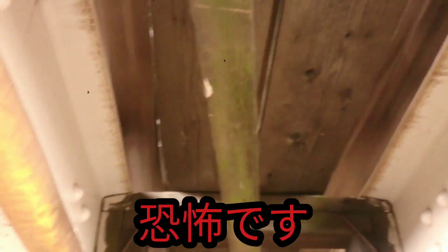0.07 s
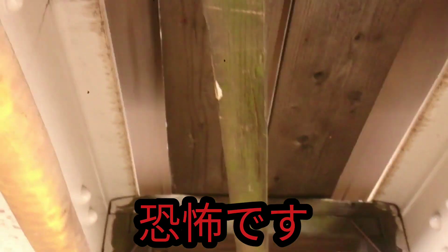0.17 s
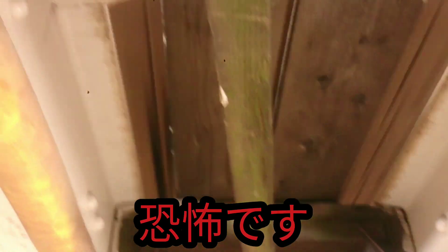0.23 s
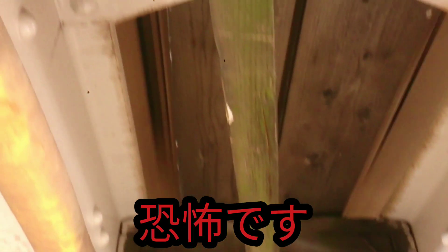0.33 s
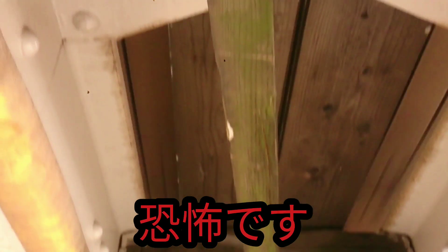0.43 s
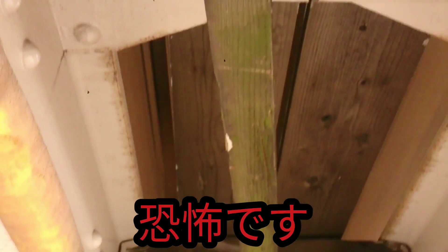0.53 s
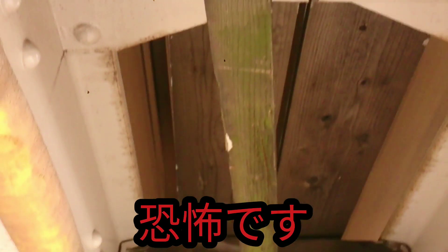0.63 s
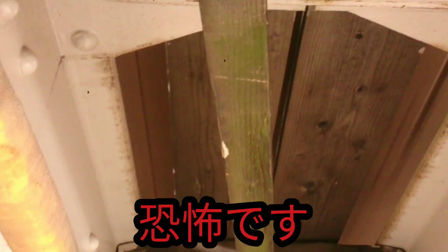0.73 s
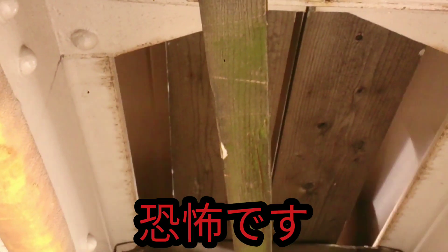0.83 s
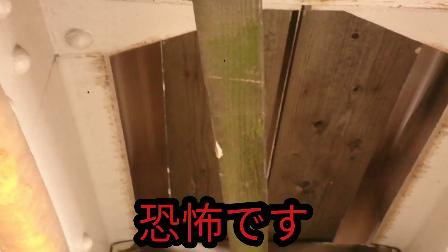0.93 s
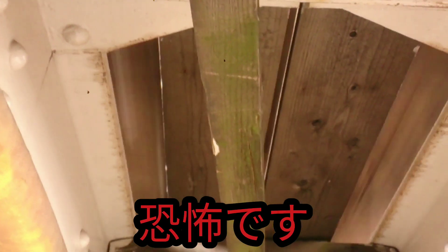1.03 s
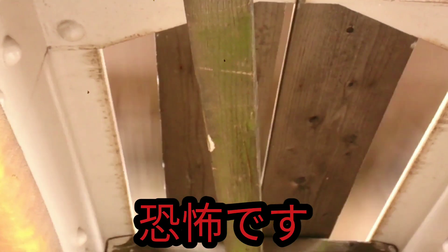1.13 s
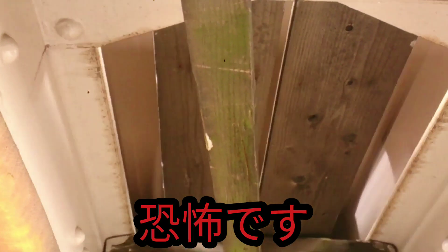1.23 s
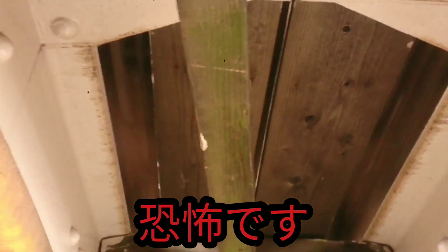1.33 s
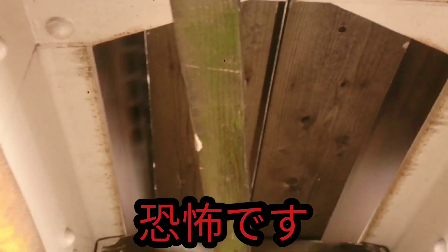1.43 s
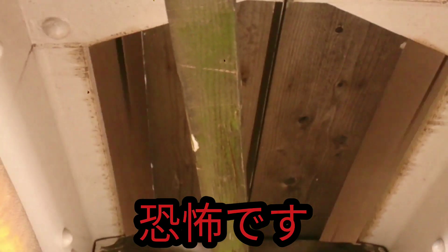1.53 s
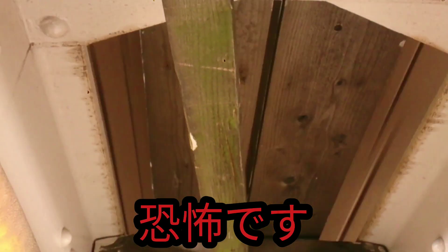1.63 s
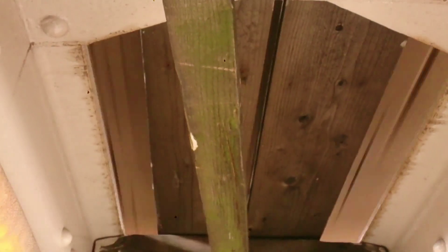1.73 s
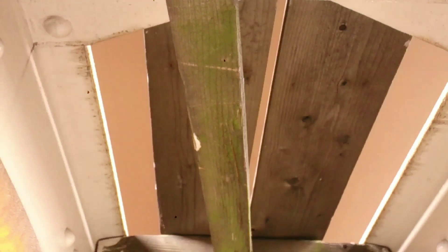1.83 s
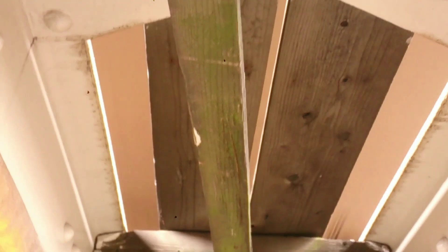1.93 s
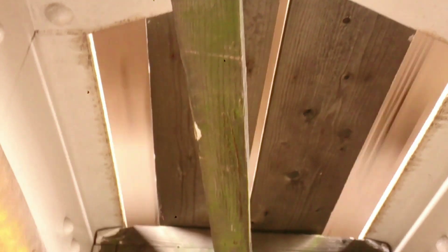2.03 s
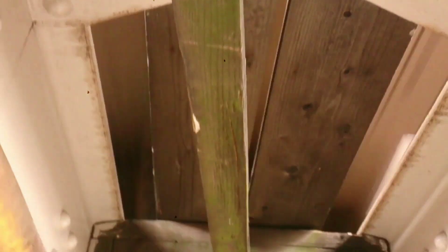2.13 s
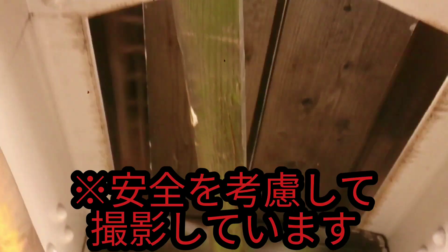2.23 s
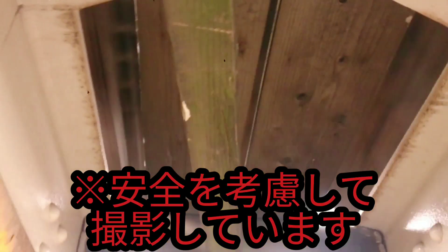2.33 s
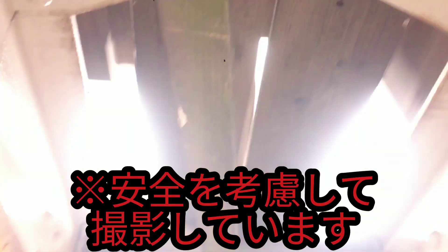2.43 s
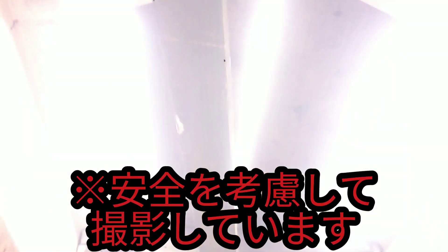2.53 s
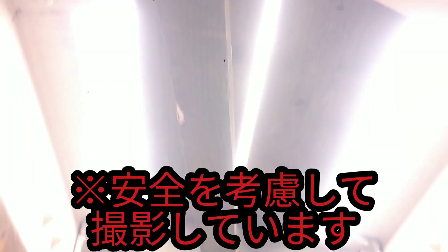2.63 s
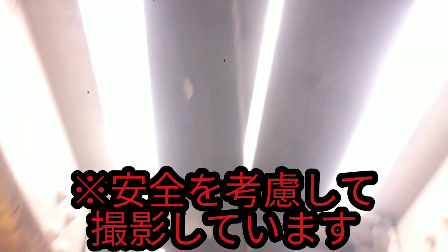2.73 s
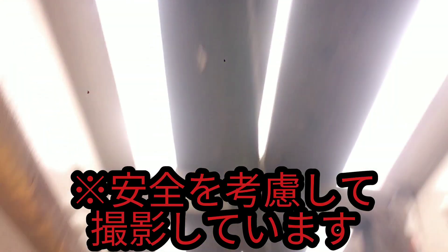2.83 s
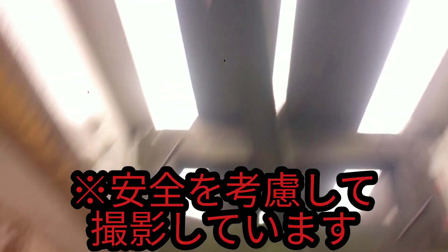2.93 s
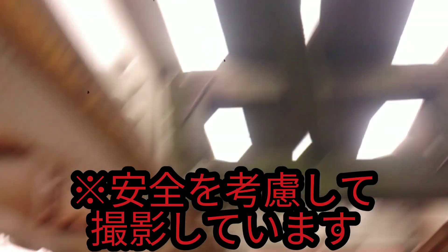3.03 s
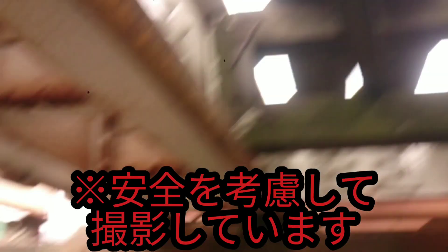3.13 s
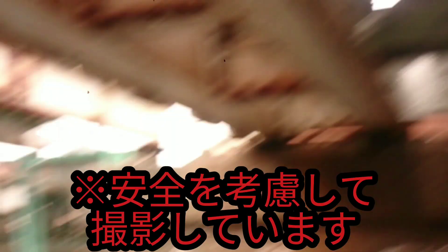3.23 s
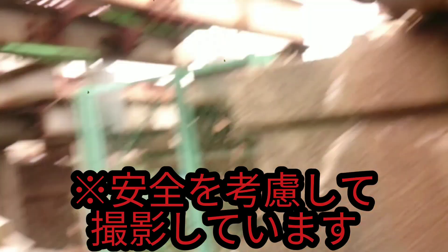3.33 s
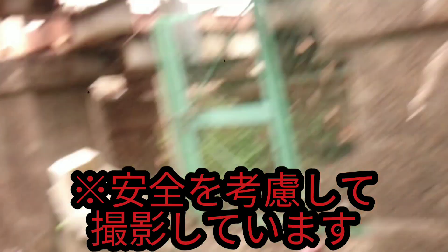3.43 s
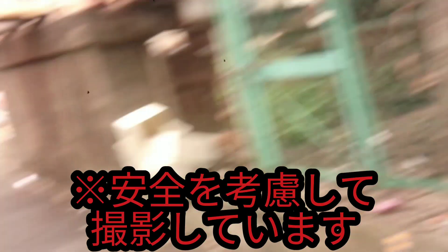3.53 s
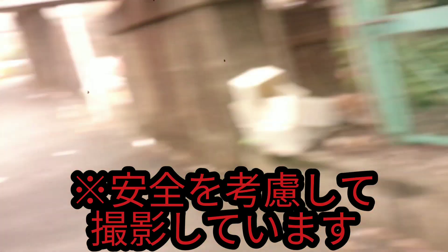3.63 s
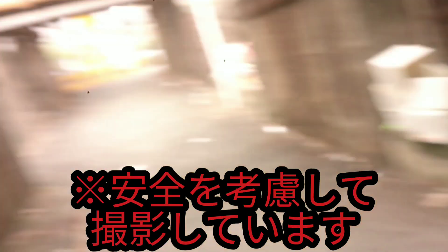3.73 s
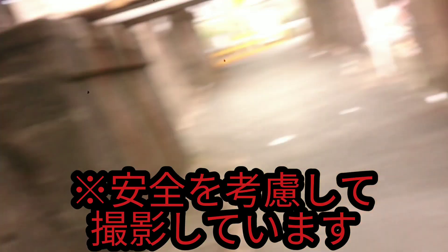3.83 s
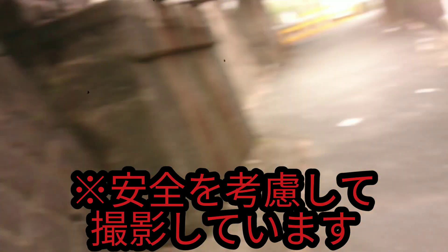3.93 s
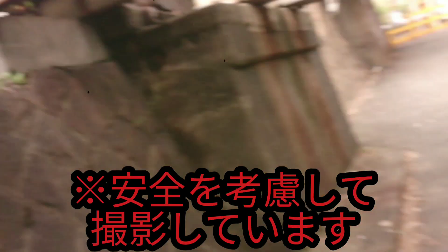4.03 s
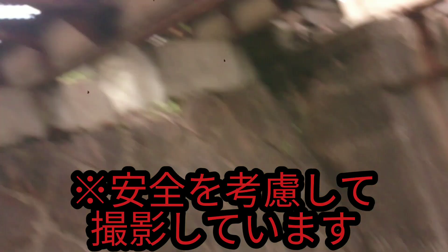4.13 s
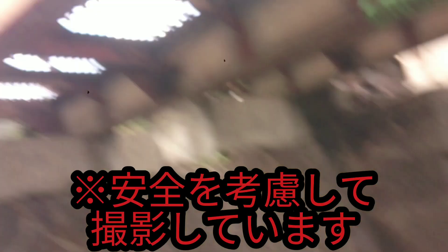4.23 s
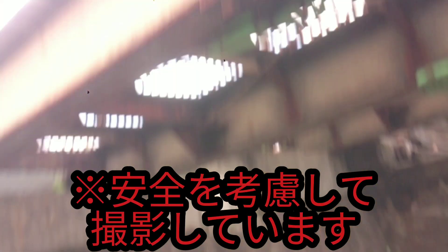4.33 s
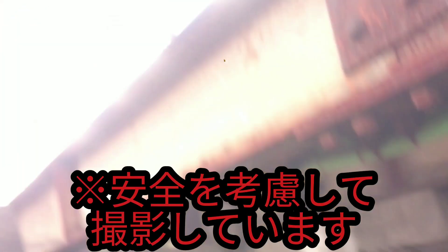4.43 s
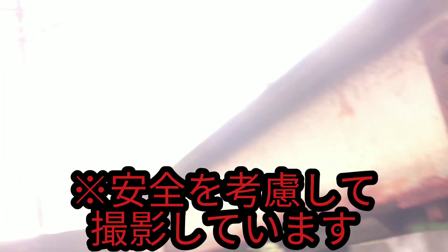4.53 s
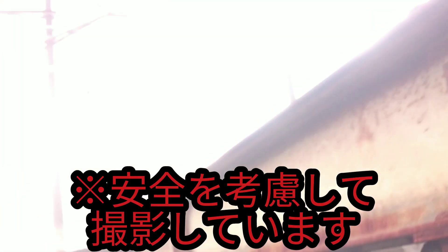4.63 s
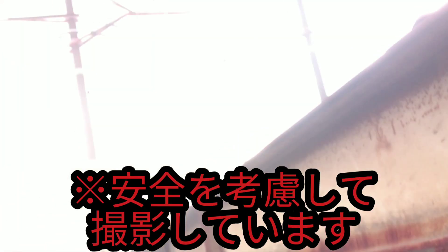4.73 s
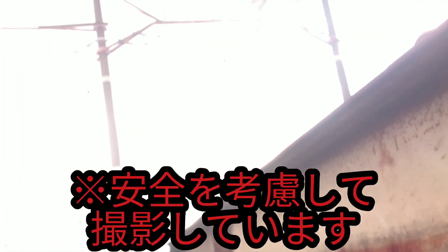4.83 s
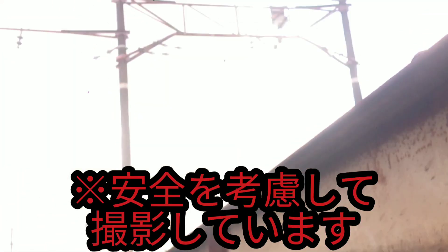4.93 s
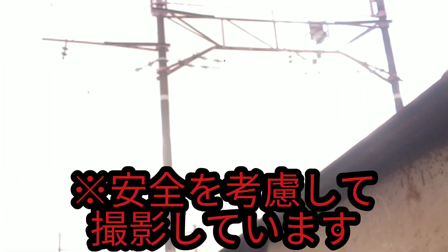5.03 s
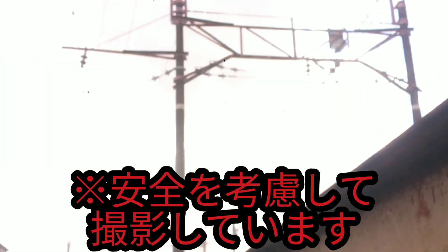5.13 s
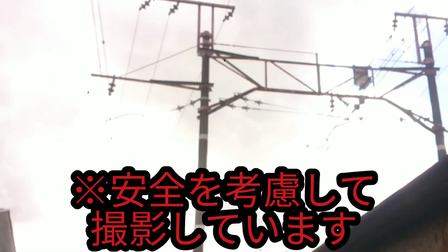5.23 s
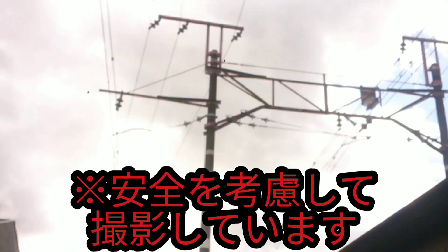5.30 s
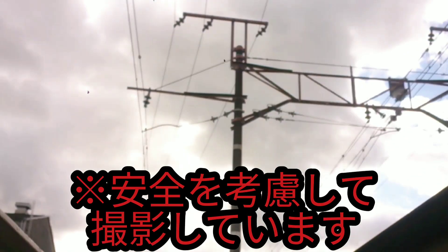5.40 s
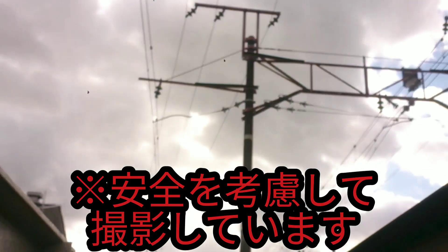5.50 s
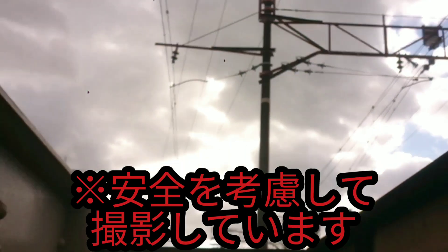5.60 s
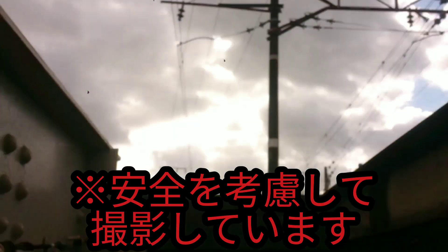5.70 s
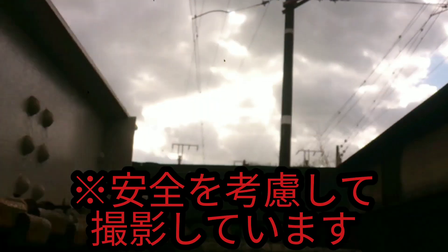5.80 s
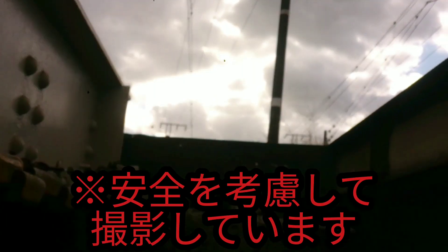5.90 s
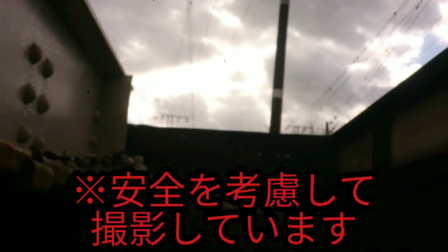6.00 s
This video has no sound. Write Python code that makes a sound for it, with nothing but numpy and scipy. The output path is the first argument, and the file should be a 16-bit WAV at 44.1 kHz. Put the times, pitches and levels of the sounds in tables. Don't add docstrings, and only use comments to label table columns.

```python
import sys
import numpy as np
from scipy import signal
from scipy.fft import rfft, irfft, next_fast_len
from scipy.io import wavfile
from scipy.ndimage import uniform_filter1d

SR = 44100
rng = np.random.default_rng(int(sys.argv[2]) if len(sys.argv) > 2 else 0)


def how_loud(loudness_db):
    steps = np.asarray(loudness_db, float) / 20
    return 10 ** steps


def store_wav(level_fs):
    pcm = np.round(np.clip(np.atleast_2d(level_fs), -1, 1) * 32767)
    wavfile.write(sys.argv[1], SR, pcm.T.astype(np.int16))


N = 267246

# (frequency [Hz], level [dB per Hz])
SHAKE = [
    [(4, -35), (10, 3.5), (25, -18.5), (33, -7), (45, 1), (58, -13), (75, -4.5), (90, -16.5), (120, -13), (200, -120)],
    [(3.5, -30), (6.0, 5.5), (19, 3), (38, -21.5), (58, -9), (70, -26), (90, -34), (120, -56), (200, -120)],
]
DECK = [
    [(47, -40), (80, -16.5), (162, -4.5), (259, -16), (303, -11.5), (407, -11.5), (453, -10), (1000, -18.5), (1300, -22), (2200, -120)],
    [(47, -40), (80, -0.5), (151, 2.5), (243, -8.5), (306, -3), (399, -9.5), (448, -0.5), (676, -15.5), (1000, -20), (1300, -41), (2200, -120)],
]
ROAR = [
    [(350, -61), (600, -4), (1230, -0.5), (1430, -2.5), (1820, -2), (1990, 1), (3240, -7.5), (3700, -10.5), (5000, -36), (6500, -50), (11000, -120)],
    [(350, -40), (600, -17), (667, -13), (1330, -2), (1540, -19), (1940, 0), (2130, -11), (2390, -3.5), (3410, -2), (5000, -10), (6500, -46), (11000, -120)],
]
HISS = [
    [(2350, -9), (4000, -2.5), (5070, -4.5), (5870, 0), (6810, 0), (8400, -9.5), (11300, -15), (13600, -29), (14100, -39)],
    [(2350, -40), (4000, -6.5), (4400, -18), (4680, -9.5), (6320, 2.5), (7850, -3.5), (8720, -5.5), (9790, -6.5), (12500, -8.5), (14100, -18)],
]
CLANK = [
    [(470, -2), (800, -23), (1220, -4), (1380, -10), (1640, -7), (1840, -9), (2630, -7.5), (3000, -14), (3900, -39), (6600, -120)],
    [(470, -52), (800, -31), (1470, -4.5), (1840, -14), (2110, 1), (2280, -10.5), (3000, -28), (3900, -45), (6600, -120)],
]
RATTLE = [
    [(1650, -41), (2800, -7.5), (3680, 2.5), (3990, -2.5), (5100, 0), (6630, 1), (11200, -120)],
    [(1650, -33), (2800, -3), (3250, 0), (3490, -4), (4480, -2), (5100, -21), (6630, -47), (11200, -120)],
]
SIZZLE = [
    [(2940, -46), (5000, -12), (5890, 0.5), (6540, 6.5), (8190, 0.5), (9050, 1.5), (10700, -3.5), (13200, -22.5), (14100, -19)],
    [(2940, -35), (5000, -22), (5310, 6), (6350, 2), (8300, -5), (10800, -27), (11800, -41), (14100, -34)],
]

# (frequency [Hz], width [Hz], level [dB])
GIRDER = [(114, 4.4, -5), (163, 25, -4), (228.8, 2.4, -7), (303, 47, -4), (332.5, 4.9, -18), (434, 38, -10),
          (577, 11, -54)]
# (frequency [Hz], width [Hz], level [dB])
RAIL = [(1360, 69, -35), (1477, 77, -1), (2120, 7.9, 3.5), (2372, 25, -0.5), (3700, 43, -29)]
# (frequency [Hz], level [dB], t60 [s])
WHEEL = [(458, -22, 0.17), (1260, 0, 0.068), (1490, -26, .1), (2120, -13, 0.13), (2494, -6, 0.08),
         (3260, -13, 0.16), (4600, -3, 0.091), (5200, -16, 0.075), (6230, -23, .1), (6100, 5, 0.08),
         (6720, 7, 0.042), (6900, -7, .1)]
# (time [s], share arriving along the rails [0-1])
DEPARTURE = [(2.9, 0.019), (3.7, 0.4), (4.6, 0.74)]
# (time [s], level [dB])
LOAD = [(0, -19), (.3, -21.5), (.6, -21), (.84, -29), (1.02, -29.5), (1.11, -24), (1.44, -19.5),
        (1.54, -23), (1.68, -21.5), (1.9, -21), (2.27, -37), (2.46, -22.5), (2.82, -23), (3.17, -41),
        (3.8, -45), (4.66, -52.5), (5.1, -50.5), (6.06, -52.5)]
# (time [s], level [dB])
NEARNESS = [(0, -30), (.25, -30.5), (.57, -28), (.72, -25.5), (.84, -36), (1.01, -37.5), (1.3, -30.5),
            (1.7, -29), (2.03, -27), (2.15, -37), (2.35, -36.5), (2.79, -30), (2.99, -36), (3.14, -43),
            (3.37, -45.5), (4.46, -52.5), (5.3, -54.5), (6.06, -54)]
# (time [s], level [dB], length [s])
LURCHES = [(.1, -26, 0.21), (.37, -28, 0.1), (0.693, -25, 0.079), (0.97, -28, 0.044), (1.45, -31, 0.13),
           (1.75, -28, 0.2), (2.014, -24, 0.13), (2.24, -32, .15), (2.868, -27.5, 0.11), (3.16, -33, 0.17),
           (3.44, -35, .08), (3.876, -38, 0.11), (4.196, -36, 0.067), (4.283, -31, 0.058),
           (4.488, -33.5, 0.24), (4.62, -37, .08), (4.91, -36, 0.24), (5.332, -36, 0.22),
           (5.808, -44, 0.15)]

# (time [s], clank [dB], brighter by [dB], heavier by [dB])
OVERHEAD = [
    (.4959, -9, -2.5, -9),
    (.6266, -10.5, -4, 5),
    (1.8052, -9.5, -5, 5),
    (1.9353, -9.5, -6, 5),
]
SPAN_END = [
    (.7194, -28, 1, 11),
    (.8700, -20, 3.5, 4.5),
    (1.156, -14.5, -4.5, 1),
    (1.2845, -12.5, -0.5, 9),
    (2.048, -22, 3, 2),
    (2.1775, -17, 2, 2),
    (2.4655, -13.5, -3, -7),
    (2.5955, -11.5, -6, 4),
]
LOOSE_CLIPS = [
    (.002, -16, -14, -3),
    (.1424, -24, 2, -5),
    (1.4494, -27, 2, 4),
    (1.5994, -24, 2.5, 4),
    (1.655, -24, -4, 0),
    (2.755, -22, 0, 4),
    (2.9134, -20, -4, -4),
]
OVERHEAD_MORE = [
    (.912, -13, 2.5, -5),
    (1.0428, -13.5, 4, -3),
]
LAST_BOGIE = [
    (3.358, -15, 0, 0),
    (3.492, -13.5, -1, 0),
]
EMBANKMENT = [
    (4.2065, -31, -1.9, 1),
    (4.339, -31.5, -0.84, -2.5),
]
FAR = [
    (3.6094, -43, 2, -13),
    (3.7499, -34, 4, 0),
    (3.918, -36.5, -6, 8.5),
    (4.034, -36, -2, -13),
    (4.1634, -31, 3, -9),
    (4.4164, -43.5, 3, 9.5),
    (4.5474, -45.5, 11, 5),
]
FARTHEST = [
    (4.931, -31, -7, 3.5),
    (5.064, -32, 2.5, 1.5),
    (5.177, -37.5, 3, 0),
    (5.312, -40, 8.5, -2),
    (5.607, -40.5, 7, -2),
    (5.735, -35.5, 0, -1.5),
]
# (frequency [Hz], level [dB over clank, under 1 kHz over thud], t60 [s])
PLACES = [
    (OVERHEAD, (-27.5, -13, -4.5, 0.5, 0), [(2180, -13, .08), (2580, -12, 0.12), (1650, -16, .08), (5860, -15, 0.1), (1230, -11, 0.12), (7200, -16, .04)]),
    (OVERHEAD_MORE, (-27.5, -13, -5.5, 0.5, 0), [(2100, -11, .05), (2440, -12, 0.06), (1230, -14, .1), (6570, -4, 0.07), (7000, -7, 0.08)]),
    (SPAN_END, (-8.5, -8, -13.5, 0.4, .001), [(1274, -13, 0.04), (889, -5, 0.047), (4080, -14, .04)]),
    (LAST_BOGIE, (-6.5, -7, -15, 0.36, .003), [(1280, -4, 0.035), (1490, -10, 0.04), (930, -4, .04), (4040, -12, .05), (6200, -15, .05)]),
    (LOOSE_CLIPS, (-9, 1, -2, 0.25, .001), [(5900, -12, .1)]),
    (EMBANKMENT, (-4.5, -6, -7, 0.3, .001), [(470, 1, 0.11)]),
    (FAR, (-10, -16, -20, 0.45, .001), [(2080, -11, 0.07), (3230, -16, .04)]),
    (FARTHEST, (-9, -13, -24.5, 0.24, 0), [(2140, -10, 0.1), (3200, -11, 0.05)]),
]
# (time [s], frequency [Hz], peak [dB], t60 [s])
OWN_RINGS = [(.515, 2400, -20, .05), (1.806, 6500, -17, .03), (1.937, 7600, -19, .03),
             (4.548, 6300, -48, .03), (4.55, 7300, -48, .04), (2.02, 5900, -26, .05),
             (2.052, 3900, -30, .08), (2.05, 1550, -28, .04), (2.915, 6000, -28, .12),
             (1.6, 6700, -26, .08), (3.918, 1400, -44, .05), (4.208, 1440, -36, .06),
             (4.208, 2300, -38, .03), (4.21, 6410, -39, .17), (4.22, 3290, -42, .08),
             (4.345, 6800, -40, .12), (4.34, 5440, -40, .08), (4.343, 4350, -42, .08),
             (4.338, 3130, -44, .05), (4.415, 2000, -44, .05), (4.932, 2150, -38, .15),
             (4.94, 1445, -46, .1), (4.95, 320, -42, .15), (4.95, 490, -44, .12), (5.07, 2390, -44, .1),
             (5.08, 1250, -46, .1), (5.068, 4340, -50, .05), (5.1, 318, -42, .1), (5.18, 3450, -48, .06),
             (5.19, 2450, -45, .1), (5.312, 2860, -42, .04), (5.312, 3500, -44, .04),
             (5.607, 3300, -46, .05), (5.607, 2120, -43, .06), (5.737, 2300, -43, .05),
             (5.74, 1400, -51, .05), (5.745, 470, -47, .12)]
# (time [s], frequency [Hz], peak [dB], length [s])
BOOMS = [(.15, 165, -20, .15), (.44, 150, -22.5, .07), (.57, 166, -19, .09), (.73, 160, -23.5, .09),
         (1.15, 172, -22, .12), (1.45, 155, -20.5, .08), (1.73, 150, -23.5, .06), (1.88, 166, -19, .09),
         (2.1, 185, -29, .12), (2.55, 170, -24, .14), (2.78, 162, -19.5, .09), (3.02, 155, -30, .07),
         (4.3, 170, -44, .15), (5.02, 150, -45, .15)]
# (start [s], stop [s], frequency [Hz], width [Hz], level [dB])
SINGING = [(2.449, 3.684, 2070, 120, -51.5), (3.0, 3.3, 1310, 460, -49), (3.716, 4.023, 1220, 170, -50.5),
           (3.748, 4.3, 2080, 260, -56), (4.402, 4.72, 2190, 54, -59), (4.52, 4.72, 6340, 700, -57),
           (4.7, 5.91, 8830, 70, -72), (5.25, 6.065, 450, 38, -64.5), (4.93, 5.215, 318, 90, -51),
           (5.16, 5.27, 217, 12, -55.5), (3.79, 3.93, 3430, 40, -55)]
# (frequency [Hz], level [dB against neighbours])
HOLES = [(7000, -7), (9000, -4.6), (10500, -3.2), (12000, -1.8), (13500, -.5)]


def rms_one(x):
    return x / np.sqrt(np.mean(x ** 2) + 1e-20)


def drift(rate):
    r = np.exp(-80 * np.pi * rate / SR)
    slow = signal.lfilter([1], [1, -2 * r, r * r], rng.standard_normal(N // 40 + 2002))[2000:]
    return np.interp(np.arange(N) / 40, np.arange(len(slow)), rms_one(slow))


def resonate(x, hz, width_hz):
    r = np.exp(-np.pi * width_hz / SR)
    poles = [1, -2 * r * np.cos(2 * np.pi * hz / SR), r * r]
    return signal.lfilter(np.array([1, 0, -1]) * (1 - r * r) / 2, poles, x)


def ring_width(t60):
    return np.log(1000) / np.pi / t60


def gone(s):
    return np.clip(np.interp(s, *np.transpose(DEPARTURE)), 0, 1)


def banded_noise(spectra, patchy_db, flicker):
    overhead = spectra[0]
    low_hz, high_hz = overhead[1][0] * .7, min(overhead[-2][0] * 1.4, 16000)
    edges = low_hz * 2 ** np.arange(0, np.log2(high_hz / low_hz) + .4, .5)
    white = rng.standard_normal((2, N))
    flat = np.zeros(N)
    for k, (low, high) in enumerate(zip(edges, edges[1:])):
        band_pass = signal.butter(2, [low, min(high, 20000)], "band", fs=SR, output="sos")
        flat += how_loud(patchy_db * drift(flicker)) * signal.sosfilt(band_pass, white[k % 2])

    size = next_fast_len(N)
    bins = rfft(flat, size)
    log_hz = np.log(np.arange(size // 2 + 1) * SR / size + 1)
    coloured = []
    for colour in spectra:
        hz, db = np.transpose(colour)
        gain = how_loud(np.interp(log_hz, np.log(hz), db))
        coloured.append(rms_one(irfft(bins * gain, size)[:N]))
    near, far = coloured
    share = gone(np.arange(N) / SR)
    return (1 - share) * near + share * far


def sung(modes, wander_db, flicker):
    out = np.zeros(N)
    for hz, width_hz, db in modes:
        tone = rms_one(resonate(rng.standard_normal(N), hz, width_hz))
        out += how_loud(db + wander_db * drift(flicker)) * tone
    return rms_one(out)


def axles():
    drops = []
    for rows, (thud_db, rattle_db, sizzle_db, t60, slow_s), ringing in PLACES:
        for s, db, bright_db, heavy_db in rows:
            drop = (s, db, db + thud_db + heavy_db, db + rattle_db + bright_db,
                    db + sizzle_db + bright_db, t60, slow_s)
            drops.append((drop, ringing))
    return drops


def shudder():
    rise_s, t60_s = 0.078, 0.31
    out, t = np.zeros(N + SR), np.arange(SR) / SR
    dying = (1 - np.exp(-t / rise_s)) ** 2 * how_loud(-120 * t / t60_s)
    for (s, db, *_), _ in axles():
        start = round(s * SR)
        out[start:start + SR] += how_loud(2 * db) * dying
    return out[:N]


def lurching():
    t = np.arange(N) / SR
    coarse = t[::64]
    humps = sum(how_loud(2 * db) * np.exp(-(2 * (coarse - s) / length) ** 2) for s, db, length in LURCHES)
    return np.interp(t, coarse, humps)


def rolling():
    t = np.arange(N) / SR
    away = gone(t)
    load_db = np.interp(t, *np.transpose(LOAD))
    near_db = np.interp(t, *np.transpose(NEARNESS))
    load_swing, near_swing = load_db + 24, near_db + 32

    drone = banded_noise(DECK, patchy_db=0.5, flicker=12.0)
    drone += how_loud(-2.0 - 5.5 * away) * sung(GIRDER, wander_db=3.0, flicker=15.6)
    roar = banded_noise(ROAR, patchy_db=2.1, flicker=27.0)
    roar += how_loud(-13.0 + 4.4 * away) * sung(RAIL, wander_db=1.0, flicker=5.5)
    shake = banded_noise(SHAKE, patchy_db=3.0, flicker=0.63)
    hiss = banded_noise(HISS, patchy_db=.5, flicker=20)

    shake_db = -33 + 0.36 * load_swing
    roar_db = -27.5 + 0.28 * load_swing + 0.64 * near_swing
    after = shudder()
    shake_gain = np.sqrt(how_loud(2 * shake_db) + lurching())
    drone_gain = how_loud(-3.5) * np.sqrt(how_loud(2 * (load_db + 1)) + how_loud(2 * -17) * after)
    roar_gain = how_loud(-5.0) * np.sqrt(how_loud(2 * roar_db) + how_loud(2 * -31) * after)
    hiss_gain = np.sqrt(how_loud(2 * near_db) + how_loud(2 * -22) * after)
    return shake_gain * shake + drone_gain * drone + roar_gain * roar + hiss_gain * hiss


def blow(t60, rise_s, shoulder):
    t = np.arange(SR // 2) / SR
    return (1 - np.exp(-t / rise_s)) * how_loud(-60 * (t / t60) ** shoulder)


def joints():
    thud_colours = [colour[2:] for colour in DECK]
    thud, clank, rattle, sizzle = [np.pad(banded_noise(c, patchy_db=2.2, flicker=8.0), (0, SR))
                                   for c in (thud_colours, CLANK, RATTLE, SIZZLE)]
    crack = signal.sosfilt(signal.butter(4, 7680, "high", fs=SR, output="sos"), sizzle)
    out = np.zeros(N + SR)
    for (s, clank_db, thud_db, rattle_db, sizzle_db, t60, slow_s), _ in axles():
        part = slice(round(s * SR), round(s * SR) + SR // 2)
        away = gone(s)
        shoulder = 1.252 + 0.11 * away ** 4
        rise_s = 0.0006 + slow_s + 0.001 * away
        out[part] += how_loud(thud_db - 8.0) * blow(t60 * (1.3 - 0.29 * away), rise_s + 0.0069, shoulder) * thud[part]
        out[part] += how_loud(clank_db - 11.0) * blow(t60 * 0.76, rise_s + 0.0023, shoulder) * clank[part]
        out[part] += how_loud(rattle_db - 5.0) * blow(t60 * 0.86, rise_s + 0.00049, shoulder) * rattle[part]
        out[part] += how_loud(sizzle_db) * blow(t60 * 0.5, rise_s, shoulder) * sizzle[part]
        out[part] += how_loud(sizzle_db + 1.5 - 3.0 * away) * blow(t60 * .35, rise_s, 1) * crack[part]

        kick = rms_one(rng.standard_normal(SR // 2)) * blow(t60 * 0.35, rise_s + 0.003, 0.84)
        for hz, db, ring_t60 in WHEEL:
            layer = np.searchsorted([900, 2900, 5000], hz)
            strength_db = (thud_db, clank_db, rattle_db, sizzle_db)[layer]
            clear_db = 11.3 + 8.0 * away * (hz > 1400) + 2 * rng.standard_normal()
            out[part] += how_loud(strength_db + db + clear_db) * resonate(kick, hz, ring_width(ring_t60))
    return out[:N]


def struck_rings():
    struck = list(OWN_RINGS)
    for (s, clank_db, thud_db, *_), ringing in axles():
        for hz, over_db, t60 in ringing:
            lag_s = .004 + 2.5 * gone(s) / hz
            struck.append((s + lag_s, hz, (thud_db if hz < 1000 else clank_db) + over_db, t60))
    out = np.zeros(N + SR)
    for s, hz, db, t60 in struck:
        chatter = rng.standard_normal(SR // 2)
        hz, db = hz * (1 + 0.0097 * chatter[0]), db + 0.5 * chatter[1]
        ring = resonate(chatter * blow(.11, .003, 1), hz, ring_width(t60))
        start = round(s * SR)
        out[start:start + SR // 2] += how_loud(db) * ring / np.abs(ring).max()
    return out[:N]


def booms():
    t = np.arange(N) / SR
    waver = np.cumsum(7.5 * drift(14.0)) / SR
    out = np.zeros(N)
    for s, hz, db, length in BOOMS:
        swell = np.exp(-2 * ((t - s) / length) ** 2)
        out += how_loud(db) * swell * np.sin(2 * np.pi * (hz * (t - s) + waver))
    return out


def singing():
    out = np.zeros(N)
    wavering = drift(10.4)
    for start, stop, hz, width_hz, db in SINGING:
        at = np.arange(round(start * SR), min(round(stop * SR), N))
        fade = np.clip(np.minimum(at / SR - start, stop - at / SR) / 0.043, 0, 1)
        white = rng.standard_normal(len(at))
        tone = rms_one(resonate(resonate(white, hz, width_hz), hz, width_hz))
        out[at] += how_loud(db + 1.5 * wavering[at]) * fade * tone
    return out


def scene():
    return np.tile(rolling() + joints() + struck_rings() + booms() + singing(), (2, 1))


def thin_treble(x):
    hz, _, bins = signal.stft(x, SR, "cosine", 2048, 1024)
    patch = uniform_filter1d(np.abs(bins) ** 2, size=3, axis=1)
    local = uniform_filter1d(patch, size=6, axis=0)
    around = uniform_filter1d(patch, size=48, axis=0)
    hole_db = np.interp(hz, *np.transpose(HOLES), left=-60)
    weak = local < around * how_loud(2 * hole_db)[:, None]
    wander = uniform_filter1d(rng.standard_normal(bins.shape[1]), size=4)
    edge_hz = 14200 - 260 * np.digitize(wander, [-.2, .6, .9])
    kept = bins * ~weak * (hz[:, None] < edge_hz)
    return signal.istft(kept, SR, "cosine", 2048, 1024)[1][:N]


def top_cut(x):
    return signal.sosfilt(signal.butter(12, 14230, fs=SR, output="sos"), x)


def record(dry):
    rounded = 0.84 * np.tanh(dry[0] / 0.96)
    mix = np.tile(thin_treble(rounded), (2, 1))
    return top_cut(mix)


dry = scene()
out = record(dry)
store_wav(out)
```